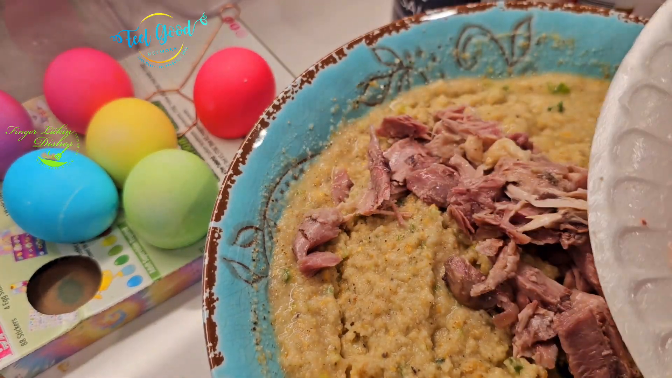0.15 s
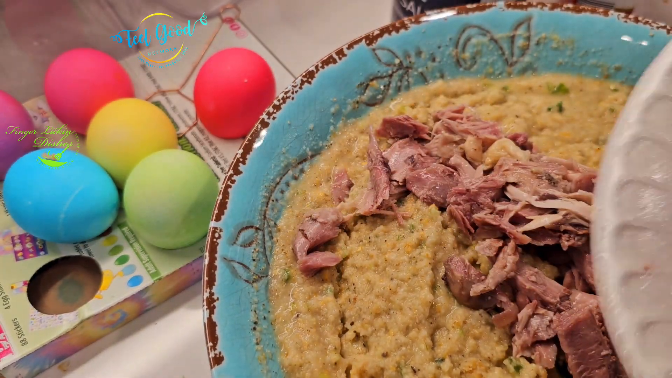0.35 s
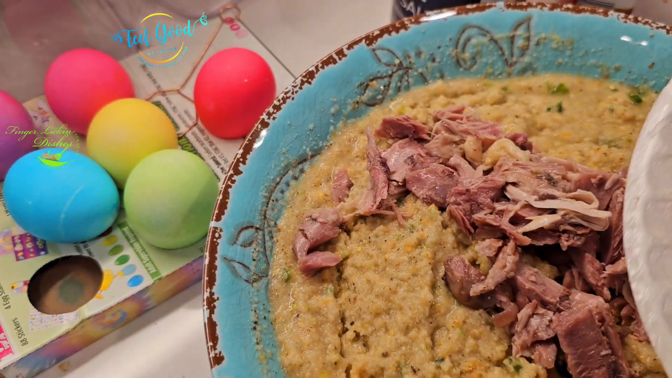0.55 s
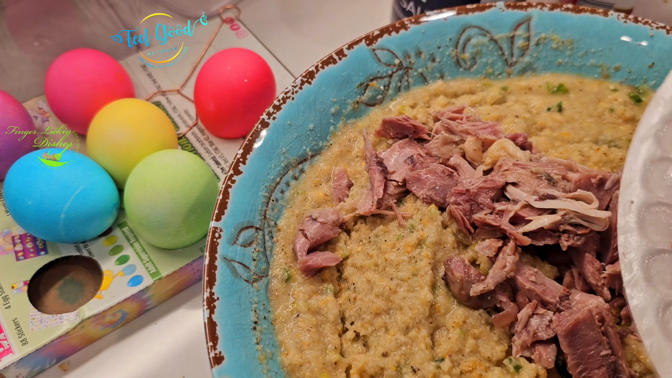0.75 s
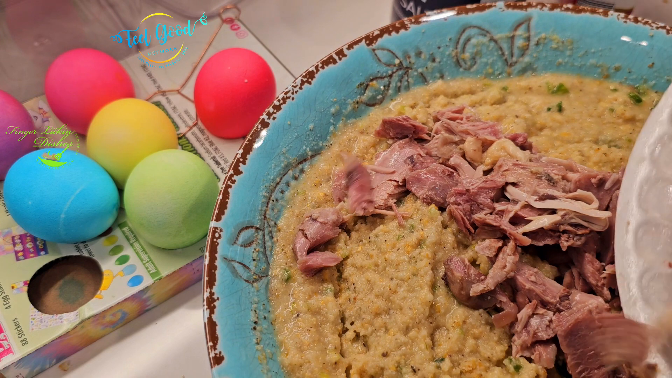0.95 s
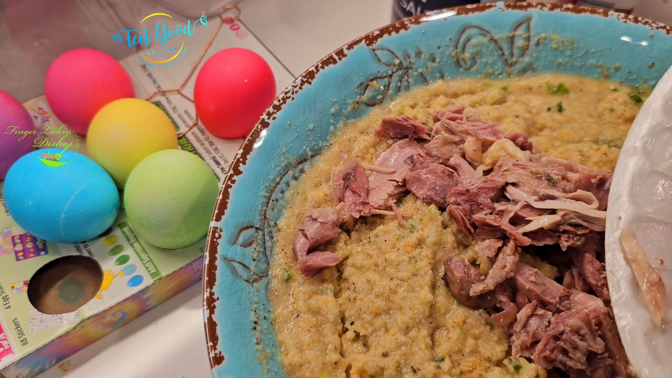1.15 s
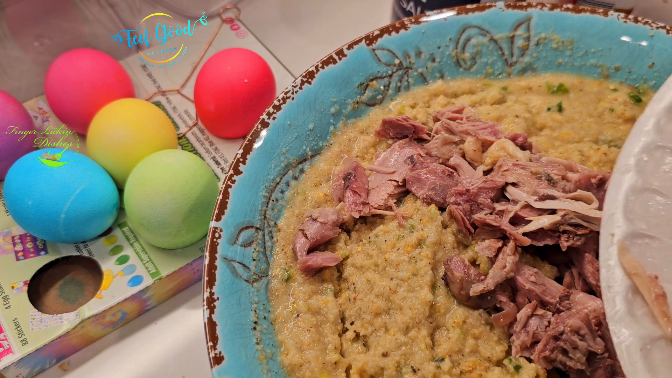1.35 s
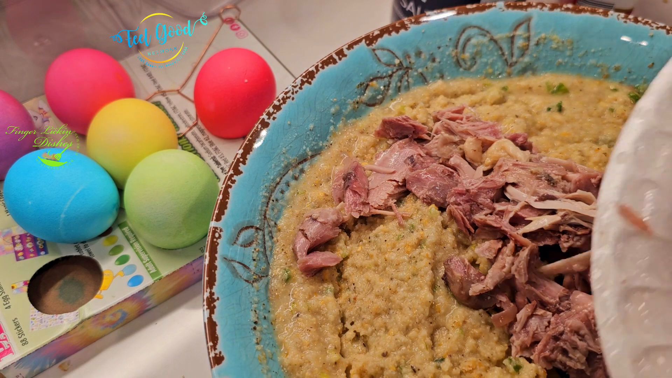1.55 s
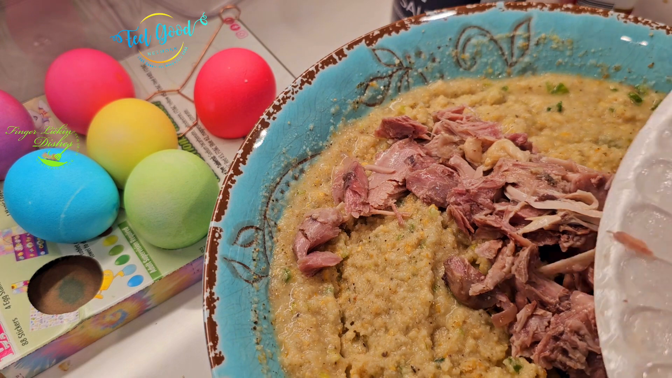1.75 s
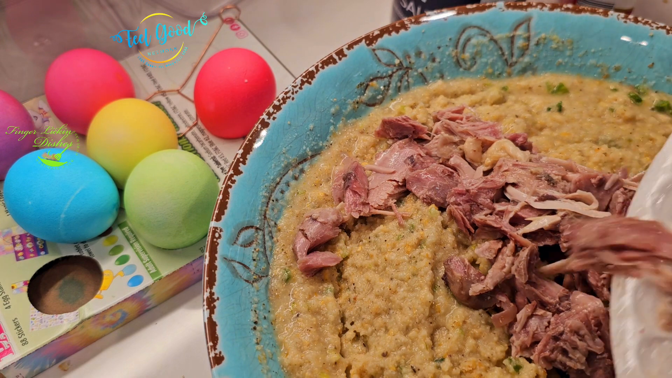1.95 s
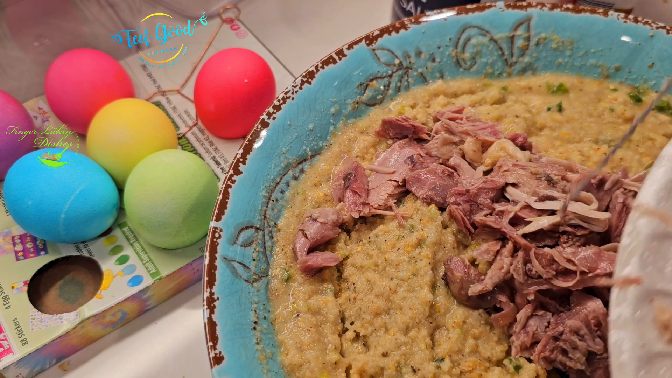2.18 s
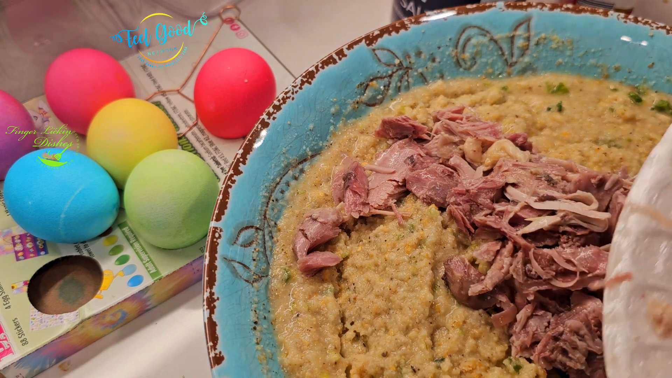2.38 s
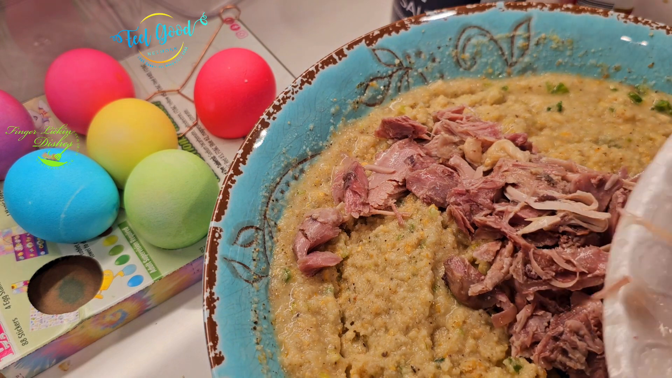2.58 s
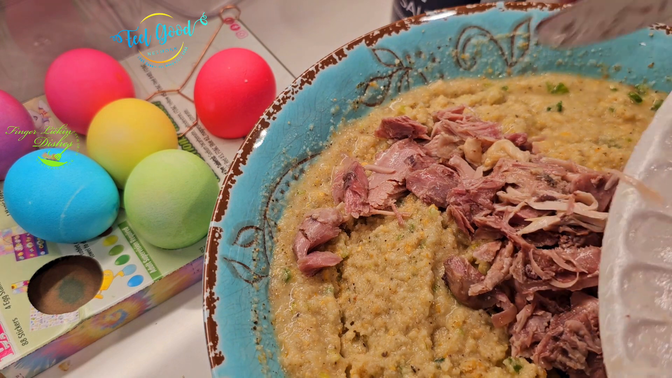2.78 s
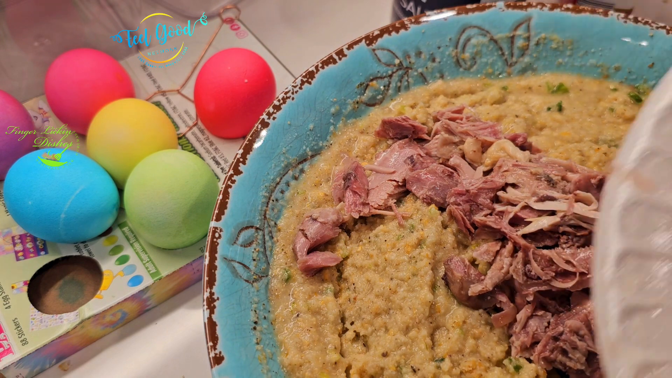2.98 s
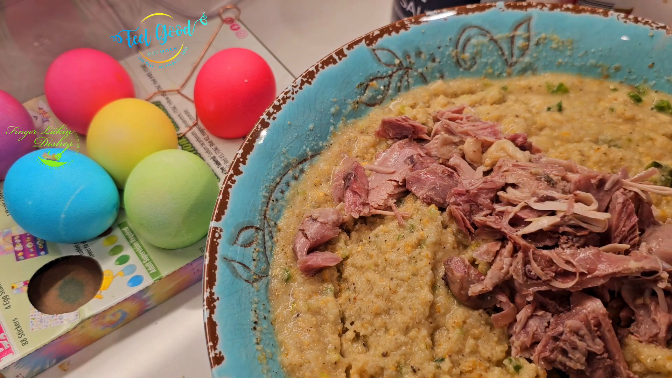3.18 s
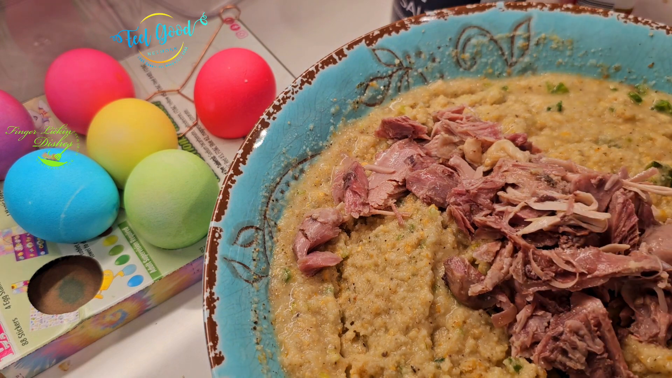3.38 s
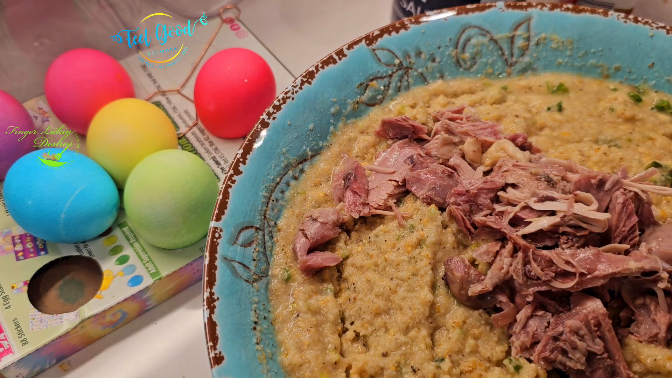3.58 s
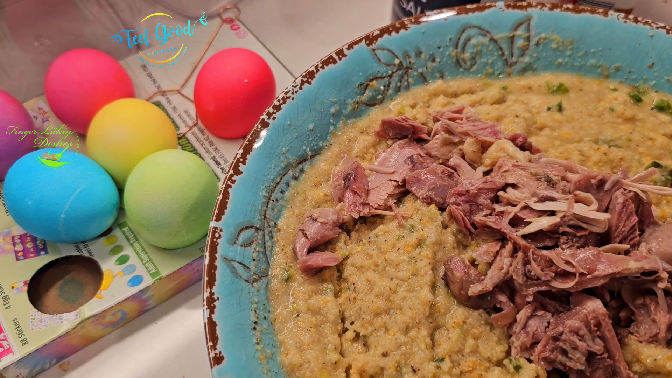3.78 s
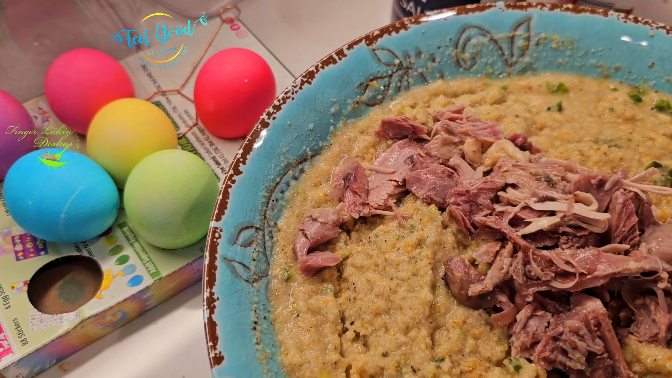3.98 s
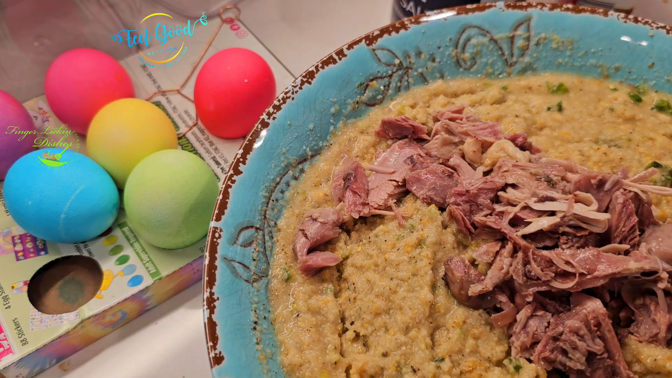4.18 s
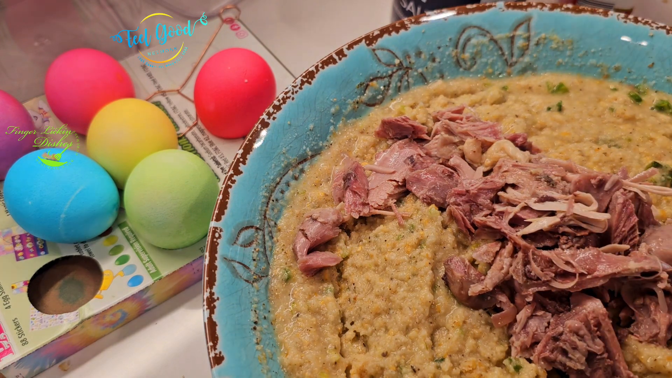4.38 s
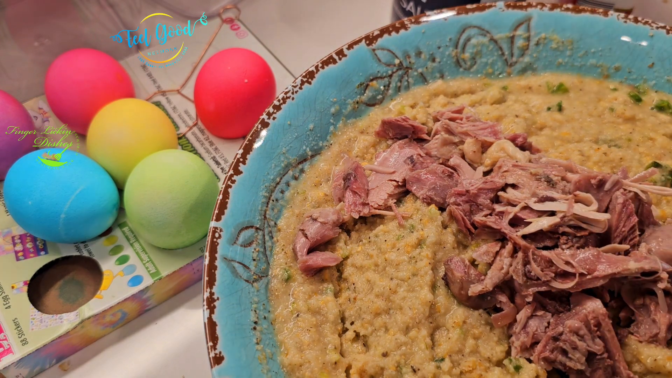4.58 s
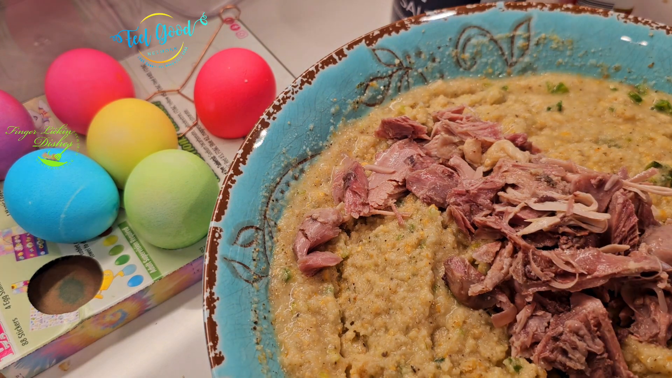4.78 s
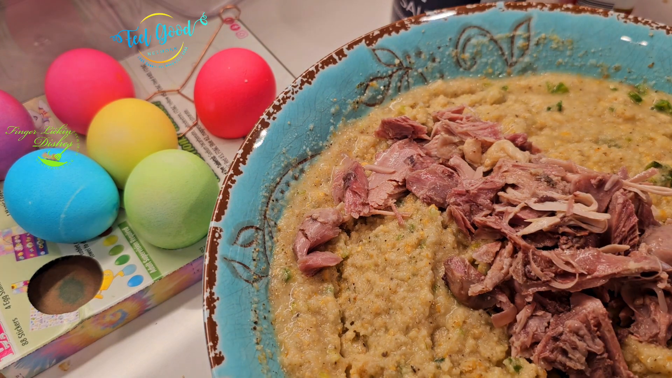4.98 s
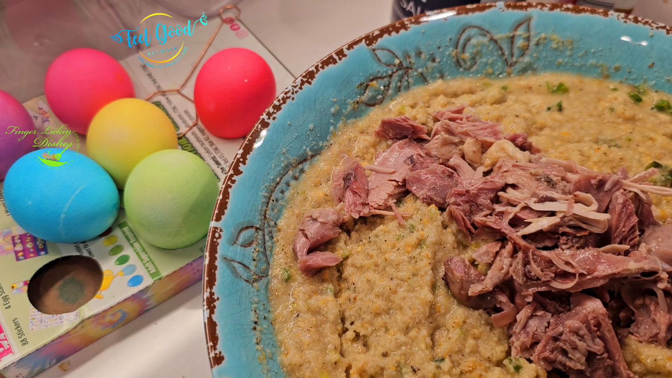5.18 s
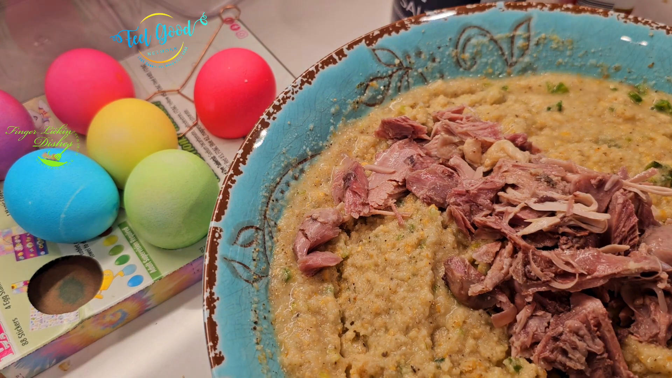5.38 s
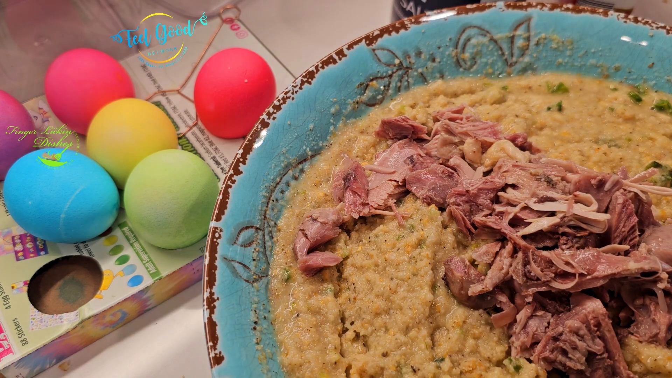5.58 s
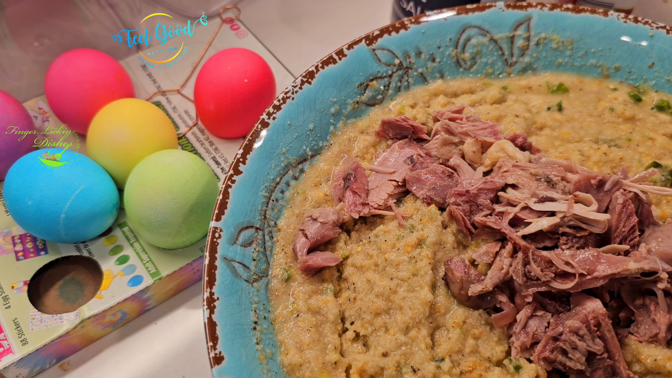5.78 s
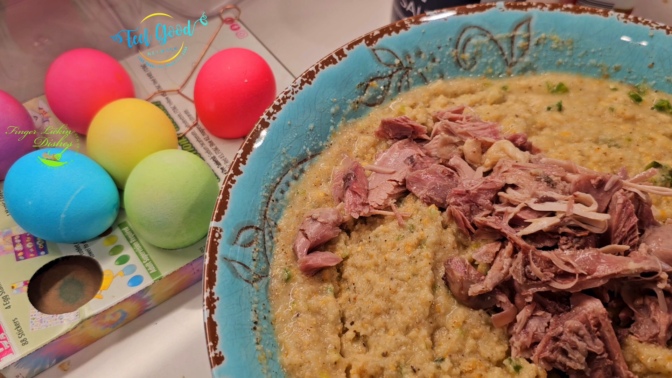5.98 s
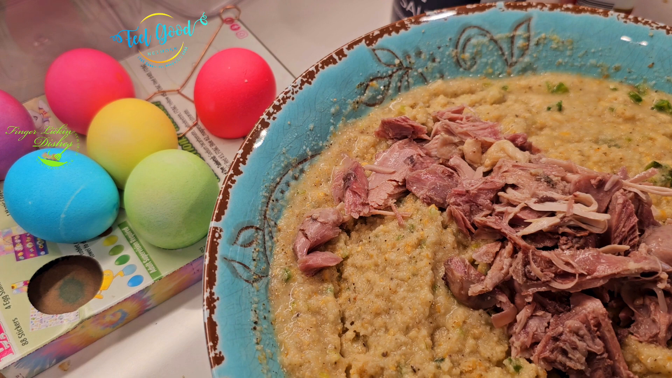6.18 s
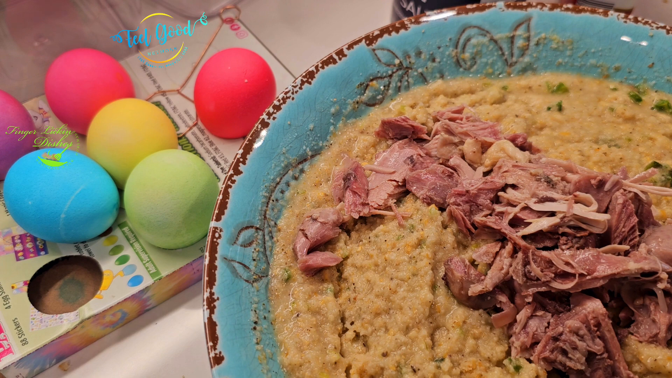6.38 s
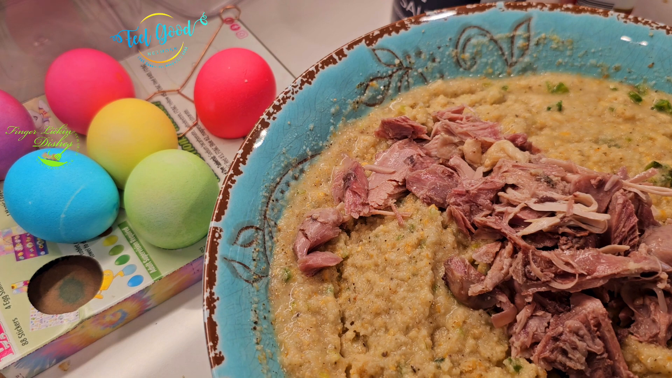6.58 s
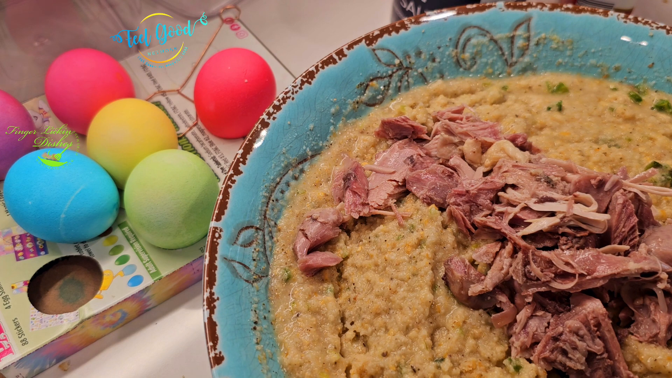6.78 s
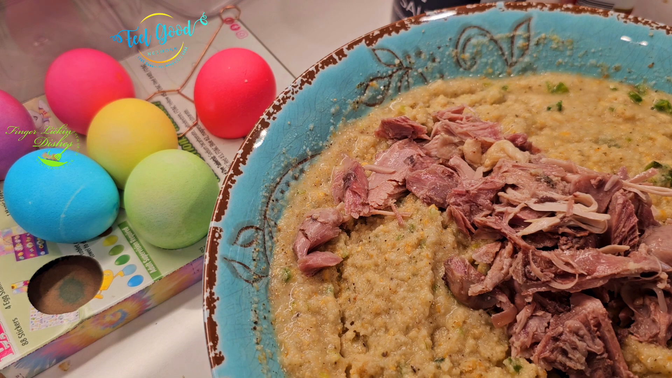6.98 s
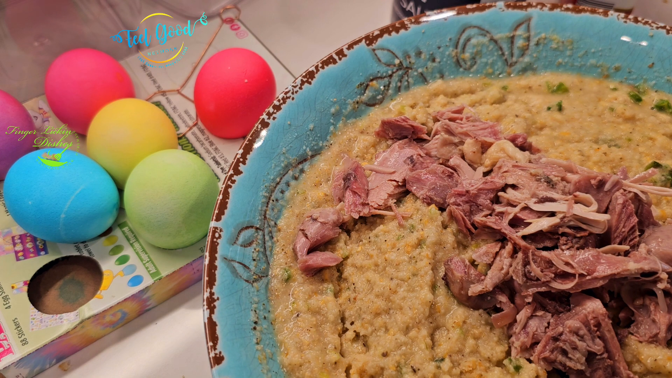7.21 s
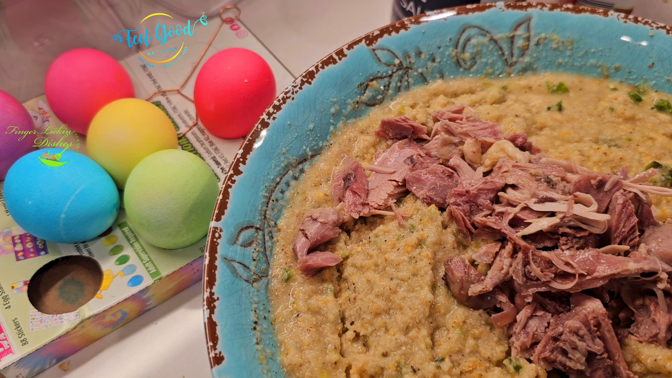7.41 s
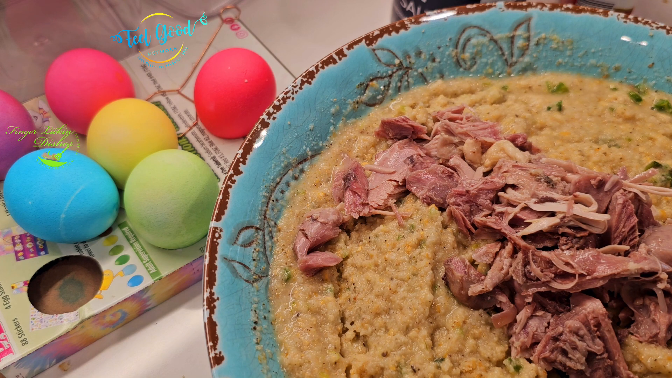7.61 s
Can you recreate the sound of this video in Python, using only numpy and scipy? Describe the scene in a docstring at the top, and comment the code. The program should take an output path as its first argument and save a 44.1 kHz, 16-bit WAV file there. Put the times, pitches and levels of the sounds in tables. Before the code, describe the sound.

Close stereo pickup in a home kitchen with steady low ventilation rumble and appliance hum. First, uneven knife scrapes and crackly taps flex a thin plate on the right, with moist ticks and brief squeaks. The scraping stops and sparse ticks remain. Then, more distant on the left, a light rub, a stuttering dry rasp and a hollow bin-like knock with rustling, ending in quiet hum.

```python
"""From start to end a small kitchen hums: tonal hum with shaped-noise rumble and air.
0-3 s, close on the right: a knife scrapes cooked meat off a light disposable plate into a bowl;
clumped friction slips, plate modes, crunching taps, wet-sounding noise ticks and unsteady sine squeaks.
4-7 s, farther off on the left: rubs and a knock, a long squeaky rasp of friction slips, then a hollow
modal knock and a rustle, likely the plate going into a bin, and a last faint hiss. A few ticks go on."""
import sys
import numpy as np
from scipy import signal
from scipy.fft import rfft, irfft, next_fast_len
from scipy.io import wavfile
from scipy.ndimage import uniform_filter1d

SR = 44100
rng = np.random.default_rng(int(sys.argv[2]) if len(sys.argv) > 2 else 0)


def output_pcm(signal):
    """Save a mono or channel-first signal as 16-bit PCM at the path in sys.argv[1].

    Samples are clipped to [-1, 1] before scaling.
    """
    pcm = np.clip(np.atleast_2d(signal).T, -1, 1) * 32767
    wavfile.write(sys.argv[1], SR, np.round(pcm).astype(np.int16))


N = 337365

# knife strokes: (start [s], bite-in [s], length [s], grit level [dB], swell start to end [dB],
# pressure as plate body over grit [dB], contact resonance [Hz])
KNIFE_STROKES = [ (0.084, 0.019, .052, -34.5, 4, -9.5, 2420), (0.158, .012, 0.1, -59, -2, 9, 1200),
                 (0.343, 0.064, 0.075, -32.5, 6.5, -5, 1900), (0.436, 0.071, 0.11, -42, -4.5, 1.5, 1390),
                 (0.828, .008, 0.061, -45, 2, -5.5, 1450), (0.891, 0.0084, 0.1, -44, 4, 4.5, 1800),
                 (1.321, 0.0068, 0.085, -44.5, -4, 0.5, 1150), (1.387, .045, 0.078, -41.5, -4, 7.5, 1550),
                 (1.849, 0.015, 0.055, -45.5, -1, -4.5, 1220), (1.927, 0.0071, .136, -45.5, 1, 2, 1500),
                 (2.536, 0.023, .054, -48.5, 5, 0, 1330), (2.625, 0.023, 0.04, -46, 7.5, 7.5, 1380)]
# scrape spectrum: (frequency [Hz], level [dB])
SCRAPE_SPECTRUM = [(150, -22), (250, -6.5), (550, -3), (1000, -5), (1400, -5.5), (2500, -9.5), (4400, -14),
                   (5300, -13.5), (7000, -15.5), (11500, -19.5), (15500, -23.5)]
# plate bending modes: (frequency [Hz], level [dB], t60 [s])
PLATE_MODES = [(258, -4, 0.035), (400.6, -4, 0.098), (547, -13, 0.034), (763, -10, 0.084),
               (1307, -3, 0.084), (1810, -33, 0.011), (2490, -11, 0.045), (3360, -14, 0.04),
               (5700, -58, 0.0082)]
KNIFE_LIFT_DB_PER_S = 603  # fall once the knife lets go


def knife():
    """Strokes drag over the plate, ring its modes and shake it in the hand."""
    start_s, _, length_s, *_, stroke_hz = np.transpose(KNIFE_STROKES)
    contact_hz = np.interp(np.arange(N) / SR, start_s + length_s / 2, stroke_hz)
    gains = drag(KNIFE_STROKES, KNIFE_LIFT_DB_PER_S)
    scrape, pressure = friction(
        gains, contact_hz, SCRAPE_SPECTRUM, slips_per_s=12000, size_db=2.5, judder_db=1.5,
        judder_per_s=190, grit_db=0.0, body_db=3.5, contact_db=-2.5, contact_width_hz=640)
    modes = ring(PLATE_MODES)
    modes = modes / np.linalg.norm(modes)
    sung = signal.oaconvolve(pressure * rng.standard_normal(N), modes)[:N]
    shake_spectrum = [(25, -7), (70, 0), (170, -9), (300, -14.5), (900, -41.5)]  # Hz, dB
    shake = unit(shape(rng.standard_normal(N), shake_spectrum))
    slow_pressure = uniform_filter1d(pressure, size=900)
    return scrape + amp(-8.5) * sung + amp(3) * shake * slow_pressure


# knife meets plate: (time [s], level [dB], flexing thump [dB], bright tick [dB], crunch centre [Hz])
PLATE_TAPS = [(0.232, -24.5, -5, -33, 1070), (0.42, -21.5, -11.5, -10, 855),
              (0.821, -21.5, -10.5, -15, 1510), (0.826, -28, -17, -12, 1620), (0.962, -22, -9.5, -26, 1700),
              (0.987, -22.5, -13, -18, 2500), (1.036, -24.5, -13, -1, 2800), (1.325, -18, -13.5, -22, 1110),
              (1.353, -29, -2.5, -21, 610), (1.468, -34, 0, -18, 1250), (1.485, -39, -9, -19, 1250),
              (1.732, -23, 1.5, -24, 1070), (1.737, -24, -27, -5, 960), (1.936, -30.5, -14, 4.5, 1700),
              (2.082, -18.5, -26, -6, 3580), (2.499, -23, 0, -20, 1600), (2.636, -29, -8, -17, 1430),
              (2.652, -25, -19, -4, 1550), (2.669, -21.5, -9, -20, 643), (2.688, -21, -17, 2.5, 1700)]
# slow flexing of the plate in the hand: (frequency [Hz], level [dB], t60 [s])
FLEX_MODES = [(60, -1, 0.086), (99.4, -1.5, 0.13), (166.3, -4.5, 0.1), (295, -9, 0.063), (524, -9, 0.034)]
# tick spectrum, also of the small ticks: (frequency [Hz], level [dB])
TICK_SPECTRUM = [(500, -47), (2000, -2), (4500, 8), (10000, 1.5), (16000, -2)]
# taps brighter than a square one only glance, and ring the plate less
SQUARE_HZ, GLANCE_DB_PER_OCTAVE = 1500, 3.5
TAP_CRUSH_S = .008  # decay constant of the buckling


def taps():
    """Each tap excites a short ring, a dull crunch, a bright tick and a slow flex of the plate."""
    out = np.zeros(N)
    for s, db, thump_db, tick_db, hz in PLATE_TAPS:
        glance_db = GLANCE_DB_PER_OCTAVE * max(np.log2(hz / SQUARE_HZ), 0)
        add(out, s, amp(db - 5.5 - glance_db) * ring(PLATE_MODES, spread=0.059))
        add(out, s, amp(db + 18.5) * crunch(hz, decay_s=TAP_CRUSH_S))
        tick = burst(decay_s=0.0014)
        bite = np.minimum(np.arange(len(tick)) / (SR * 0.0018), 1)
        add(out, s, amp(db + tick_db + 20.0) * colour(tick * bite, TICK_SPECTRUM))
        add(out, s, -amp(db + thump_db + 10.0) * ring(FLEX_MODES, spread=0.019))
    return out


# small ticks, wet-sounding during the scraping; a few sparse ones later: (time [s], level [dB])
SMALL_TICKS = [(0.2548, -32), (0.663, -52.5), (0.7425, -47), (1.585, -49), (1.736, -28), (1.7683, -40.5),
               (2.9144, -55), (3.1264, -47.5), (3.149, -46.5), (3.294, -49), (3.5168, -44), (3.5668, -49.5),
               (3.672, -55), (3.6975, -49), (6.0784, -51), (6.5999, -53), (6.7256, -53.5)]
SNAPS_PER_S, SNAP_DB = 25, -52


def ticks():
    """Very short bright noise bursts, over a sparse random scatter of single-sample snaps."""
    hits = rng.random(N) < SNAPS_PER_S / SR
    snaps = rng.standard_normal(N) * hits * amp(SNAP_DB)
    out = colour(snaps, TICK_SPECTRUM)
    for s, db in SMALL_TICKS:
        add(out, s, amp(db + 14.0) * colour(burst(decay_s=0.00042), TICK_SPECTRUM))
    return out


# brief squeaks, of knife on plate at first, later of the long rasp:
# (centre time [s], mean pitch [Hz], length [s], level [dB])
BRIEF_SQUEAKS = [(0.428, 773, 0.034, -24), (2.085, 3550, 0.006, -28), (2.588, 1286, 0.032, -32),
                 (2.691, 3636, 0.013, -25.5), (2.688, 5290, 0.013, -30.5), (2.698, 1432, 0.03, -33),
                 (4.688, 3870, .014, -21), (4.69, 2315, 0.087, -35), (4.71, 2240, 0.022, -25),
                 (4.714, 3840, 0.013, -24)]


def squeaks(rows):
    """A catching contact sings briefly at an unsteady pitch."""
    out = np.zeros(N)
    for s, hz, length_s, db in rows:
        count = int(length_s * SR)
        jitter = unit(uniform_filter1d(rng.standard_normal(SR // 4), size=60))[:count]
        turns = np.cumsum(hz * (1 + 0.026 * jitter)) / SR
        add(out, s - length_s / 2, amp(db) * np.hanning(count) * np.sin(2 * np.pi * turns))
    return out


# rubs and rustles on the left, the last one a faint hiss: (start [s], bite-in [s], length [s],
# grit level [dB], swell start to end [dB], body over grit [dB])
FAR_RUBS = [ (4.085, 0.013, 0.11, -66, -10, -4), (4.39, 0.048, 0.059, -60, -5, -1),
            (4.556, 0.0017, 0.036, -43.5, -0.5, 0.5), (4.595, 0.023, 0.063, -46, 8, -8),
            (5.24, 0.02, 0.039, -40.5, -1, 0), (5.34, .04, 0.18, -70.5, 3, 3),
            (5.525, 0.035, 0.1, -52.5, 4, -2.5), (5.775, 0.016, 0.029, -67, -5.5, 16),
            (6.17, 0.0031, .028, -59.5, 1, 2), (6.197, 0.014, 0.09, -27.5, -22, -4.5),
            (6.275, 0.027, 0.063, -25.5, -3.5, -11.5), (6.384, 0.014, 0.026, -32, -8, -14.5),
            (6.432, 0.022, 0.021, -43, -4.5, 0), (6.54, .01, 0.011, -59.5, -0.5, 5),
            (7.06, 0.066, 0.58, -76, -0.5, 5)]
# rasp spectrum: (frequency [Hz], level [dB])
RASP_SPECTRUM = [(90, -14), (150, 4.5), (330, 2.5), (700, 2.5), (1100, 0.5), (2200, -7), (3700, -7.5),
                 (6000, -10), (10000, -14.5), (12000, -12.5), (15500, -18.5)]
# blows on the bin: (time [s], ring level [dB], crack level [dB], crack centre [Hz])
BIN_KNOCKS = [(4.562, -49, -5, 347), (6.201, -27, 5, 1570), (6.216, -29, -3.5, 2400),
              (6.225, -34, 0.5, 795)]
# hollow ring of the bin: (frequency [Hz], level [dB], t60 [s])
BIN_MODES = [(136.7, 0, 0.25), (338, -4.5, 0.24), (489, 2, 0.68), (571, 1.5, 0.32), (711, -3, 0.29),
             (758, 5, .35), (933, -3, 0.26), (1280, 7, .12), (1542, 3, 0.051)]
RUB_LIFT_DB_PER_S = 494  # fall once the contact lets go
RASP_HZ, RASP_HZ_PER_DB = 3050, 16  # contact resonance at PULL_DB; harder rubbing raises it


def bin_sounds():
    """Friction rubs and a long rasp, as of a plate along a bin liner; blows crack and ring the bin."""
    gains = drag(FAR_RUBS, RUB_LIFT_DB_PER_S) + amp(.5) * pull()
    level_db = 20 * np.log10(gains[0] + 1e-5)
    contact_hz = RASP_HZ + RASP_HZ_PER_DB * (level_db - PULL_DB)
    out, _ = friction(
        gains, contact_hz, RASP_SPECTRUM, slips_per_s=14000, size_db=2.5, judder_db=1.4,
        judder_per_s=220, grit_db=2.5, body_db=4.5, contact_db=-3.5, contact_width_hz=830)
    for s, ring_db, crack_db, hz in BIN_KNOCKS:
        add(out, s, amp(ring_db) * ring(BIN_MODES))
        add(out, s, amp(crack_db) * crunch(hz, decay_s=.004))
    return out


# long rasp, one continuous pull: (time [s], grit level [dB])
PULL_LEVEL = [(4.67, -50), (4.678, -49.5), (4.686, -32.5), (4.798, -36), (4.814, -31.5), (4.846, -39.5),
              (5.062, -36.5), (5.072, -43.5), (5.12, -34), (5.146, -41), (5.17, -35.5), (5.228, -52.5),
              (5.245, -44)]
# usual grit level, body level there, and the share of each swell the body follows
PULL_DB, PULL_BODY_DB, BODY_SHARE = -34, -42, 0.72


def pull():
    """Grit and body gains of the long rasp: the harder the pull, the brighter."""
    s, db = np.transpose(PULL_LEVEL)
    grit_db = np.interp(np.arange(N) / SR, s, db, left=-200, right=-200)
    body_db = PULL_BODY_DB + BODY_SHARE * (grit_db - PULL_DB)
    return amp([grit_db, body_db])


# ventilation rumble spectrum: (frequency [Hz], level [dB])
RUMBLE_SPECTRUM = [(15, -5), (30, -5), (58, 1.5), (82, -4), (103, 0.5), (130, -9.5), (172, -5),
                   (210, -13.5), (280, -29), (500, -65)]
# air noise spectrum: (frequency [Hz], level [dB])
AIR_SPECTRUM = [(140, -18), (230, 0), (300, -6.5), (345, -4), (377, -9.5), (441, -9), (565, -10.5),
                (789, -16.5), (1080, -19), (2350, -22.5), (2570, -23), (15500, -52.5)]
# likeness of rumble and air at the two ears: (frequency [Hz], likeness [0-1])
EAR_LIKENESS = [(60, 1), (200, 0.9), (500, 0.44), (1200, 0), (15000, .05)]
# appliance hum: (mean frequency [Hz], rms level [dB])
HUM_TONES = [(58, -51.5), (174, -56), (768, -75.5)]
RUMBLE_DB, AIR_DB, HUM_WANDER_HZ = -41.0, -53.0, 2.484


def background():
    """Ventilation rumble, soft air noise and an appliance hum of wavering pitch."""
    hz = np.fft.rfftfreq(N, 1 / SR)
    likeness = np.clip(read(EAR_LIKENESS, hz), 0, 1)
    mid, side = rfft(rng.standard_normal((2, N))) * np.sqrt([1 + likeness, 1 - likeness])
    ears = np.array([mid + side, mid - side])
    rumble = amp(RUMBLE_DB) * unit(irfft(ears * amp(read(RUMBLE_SPECTRUM, hz)), N))
    # 1j: a quarter turn of phase from the rumble
    air = amp(AIR_DB) * unit(irfft(1j * ears * amp(read(AIR_SPECTRUM, hz)), N))
    hum = np.zeros(N)
    for tone_hz, db in HUM_TONES:
        turns = np.cumsum(tone_hz + HUM_WANDER_HZ * wander(per_s=9)) / SR
        hum += amp(db) * np.sqrt(2) * np.sin(2 * np.pi * turns)
    return (rumble + air) * amp(.5 * wander(per_s=6)) + hum


BITE_DB = 27  # climb of a stroke as the edge bites in


def drag(rows, lift_db_per_s):
    """Grit and body gains of strokes that bite in, hold with a swell, and let go."""
    grit, body = np.zeros((2, N))
    for s, bite_s, length_s, db, swell_db, pressure_db, *_ in rows:
        t = np.arange(0, length_s + .5, 1 / SR)
        held_db = db + swell_db * (np.minimum(t / length_s, 1) - .5)
        bite_db = BITE_DB * np.maximum(1 - t / bite_s, 0)
        lift_db = lift_db_per_s * np.maximum(t - length_s, 0)
        level_db = held_db - bite_db - lift_db
        add(grit, s, amp(level_db))
        add(body, s, amp(level_db + pressure_db))
    return np.array([grit, body])


def friction(gains, contact_hz, spectrum, slips_per_s, size_db, judder_db, judder_per_s,
             grit_db, body_db, contact_db, contact_width_hz):
    """Tiny slips in uneven clumps; pressure brings out the body and a moving contact resonance."""
    grit, body = uniform_filter1d(gains, size=90)
    hits = rng.random(N) < slips_per_s / SR
    sizes = amp(size_db * np.minimum(rng.exponential(1, N), 4))
    slips = rng.standard_normal(N) * hits * sizes
    judder = wander(judder_per_s) + 0.7 * wander(judder_per_s / 4)  # fast judder, slower catches
    slips = slips * amp(judder_db * judder)
    sound = colour(slips, spectrum)
    high = unit(band(sound, 2520, "high"))
    low = unit(band(sound, 2180, "low"))
    shifted = np.roll(slips, SR)  # 1 s shift, so the resonance is independent of the grit
    contact = unit(resonate(shifted, contact_hz, contact_width_hz))
    pressed = amp(contact_db) * contact - amp(body_db) * low
    return amp(grit_db) * high * grit + pressed * body, body


def resonate(x, hz, width_hz):
    """A resonance of gain 1 that follows the curve hz, by shifting it to 0 Hz and back."""
    turn = np.exp(2j * np.pi * np.cumsum(hz) / SR)
    r = np.exp(-np.pi * width_hz / SR)
    return 2 * (turn * signal.lfilter([1 - r], [1, -r], x / turn + 1e-18)).real


def ring(modes, spread=0.):
    """Dying sines of alternating sign; each contact point detunes them by the spread."""
    t = np.arange(SR // 2) / SR
    out = np.zeros(len(t))
    for k, (hz, db, t60_s) in enumerate(modes):
        mode_hz = hz * (1 + spread * rng.standard_normal())
        decay = amp(db - 60 * t / max(t60_s, .003))
        out += (-1) ** k * decay * np.sin(2 * np.pi * mode_hz * t)
    return out


# crunch spectrum around its centre: (multiple of the centre [ratio], level [dB])
CRUNCH_SPECTRUM = [(.1, -2.5), (.3, -4), (.55, -5), (1, 8), (1.3, -2.5), (1.8, -9.5), (4, -15), (14, -33.5)]


def crunch(hz, decay_s):
    """A sharp blow, then thin material buckles for a moment."""
    force = .55 * burst(decay_s)
    force[0] += .8
    return colour(force, [(hz * multiple, db) for multiple, db in CRUNCH_SPECTRUM])


def burst(decay_s):
    """A crushing contact: dying noise of energy 1."""
    t = np.arange(SR // 8) / SR
    x = rng.standard_normal(len(t)) * np.exp(-t / decay_s)
    return x / np.linalg.norm(x)


def wander(per_s):
    """Random curve of rms 1, straight between per_s knots a second."""
    knots = rng.standard_normal(N // 20)
    return unit(np.interp(np.arange(N) * per_s / SR, np.arange(len(knots)), knots))


def amp(db):
    """Decibels to gain."""
    return 10 ** (np.asarray(db) / 20)


def unit(x):
    """Scales to rms 1."""
    return x / np.sqrt(np.mean(x ** 2) + 1e-20)


def read(points, hz):
    """Reads a table on a log-frequency axis."""
    f, value = np.transpose(points)
    return np.interp(np.log(hz + 1), np.log(f + 1), value)


def add(mix, s, sound):
    """Mixes a sound in at time s."""
    part = mix[max(round(s * SR), 0):][:len(sound)]
    part += sound[:len(part)]


def colour(x, points):
    """Causal minimum-phase filter with the given spectrum and unit energy."""
    size = 4096
    level_db = np.maximum(read(points, abs(np.fft.fftfreq(size, 1 / SR))), -100)
    log_gain = np.log(amp(level_db))
    impulse = np.fft.ifft(np.exp(np.conj(signal.hilbert(log_gain)))).real[:size // 2]
    return signal.oaconvolve(x, impulse / np.linalg.norm(impulse))[:len(x)]


def shape(x, points):
    """Zero-phase equaliser for long sounds."""
    size = next_fast_len(len(x) + SR // 10)
    gain = amp(read(points, np.fft.rfftfreq(size, 1 / SR)))
    return irfft(rfft(x, size) * gain, size)[:len(x)]


def band(x, hz, kind):
    """Low-pass or high-pass."""
    return signal.sosfilt(signal.butter(2, hz, kind, fs=SR, output="sos"), x)


# kitchen reverberation: (frequency [Hz], t60 [s])
ROOM_T60 = [(150, 0.14), (1000, 0.33), (4000, 0.39), (9000, 0.29), (15000, 0.14)]


def room_tail():
    """Noise of energy 1 in which each band dies at its own speed."""
    hz, t, z = signal.stft(rng.standard_normal(SR // 2), SR, nperseg=256)
    decay = amp(-60 * t / read(ROOM_T60, hz)[:, None])
    tail = signal.istft(z * decay, SR, nperseg=256)[1]
    tail[:SR // 150] = 0  # the walls answer a moment later
    return tail / np.linalg.norm(tail)


def place(x, lags, side, scatter_db, scatter_s, room_db, count=6):
    """Sound reaches one ear first; nearby surfaces scatter the treble, changing as the contact moves."""
    shares = np.array([wander(per_s=110) for _ in range(count)])
    feeds = x * shares / np.linalg.norm(shares, axis=0)
    total = np.sqrt(1 + amp(scatter_db) ** 2 + amp(room_db) ** 2)
    ears = []
    for lag, sign in zip(lags, (1, -1)):
        scatter = np.zeros(N)
        for feed in feeds:
            echo = band(burst(scatter_s)[:SR // 40], 1670, "high")
            scatter += signal.oaconvolve(feed, echo)[:N]
        room = signal.oaconvolve(x, room_tail())[:N]
        heard = (np.roll(x, lag) + amp(scatter_db) * scatter + amp(room_db) * room) / total
        ears.append(shape(heard, [(f, sign * db / 2) for f, db in side]))
    return np.array(ears)


# near place, left minus right: (frequency [Hz], level [dB])
NEAR_TILT = [(100, -4.5), (600, -5), (1500, -1.5), (4000, -4), (7500, 0.5), (10500, -10.5), (14500, -2.5)]
# far place, left minus right: (frequency [Hz], level [dB])
FAR_TILT = [(100, 0), (700, 3), (3500, 4.5), (7000, 2.5), (10500, 1), (14500, 7.5)]
MOVE_S = 3.5  # squeaks from here on sound at the bin: the plate is carried there from the bowl


def scene():
    """The plate near on the right, the bin farther on the left, the background around."""
    near_squeaks = squeaks([row for row in BRIEF_SQUEAKS if row[0] < MOVE_S])
    far_squeaks = squeaks([row for row in BRIEF_SQUEAKS if row[0] >= MOVE_S])
    near = knife() + taps() + ticks() + near_squeaks
    far = bin_sounds() + far_squeaks
    right_first, left_first = (10, 0), (0, 18)  # (left, right) lags in samples
    return (place(near, right_first, NEAR_TILT, scatter_db=4.0, scatter_s=0.0047, room_db=-11.5)
            + place(far, left_first, FAR_TILT, scatter_db=3.5, scatter_s=0.0061, room_db=-5.5)
            + background() * amp([[.4], [-.4]]))


EDGE_HZ = 15650


def record(dry):
    """Low-pass that limits the band to EDGE_HZ."""
    lowpass = signal.firwin(511, EDGE_HZ, window=("kaiser", 9), fs=SR)
    return signal.oaconvolve(dry, lowpass[None], "same")


dry = scene()
out = record(dry)
output_pcm(out)
```